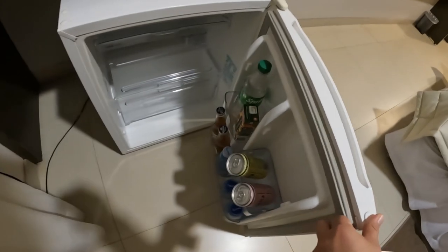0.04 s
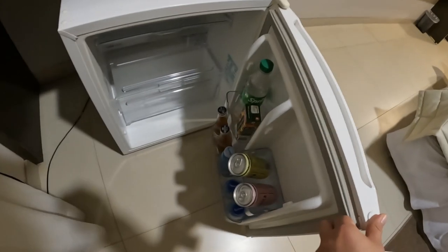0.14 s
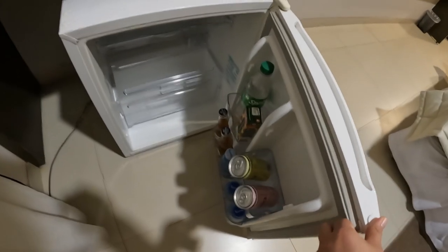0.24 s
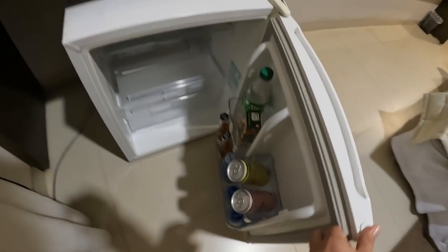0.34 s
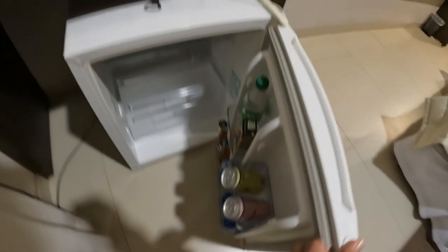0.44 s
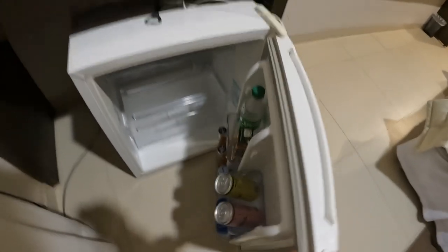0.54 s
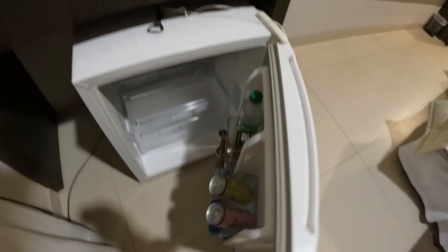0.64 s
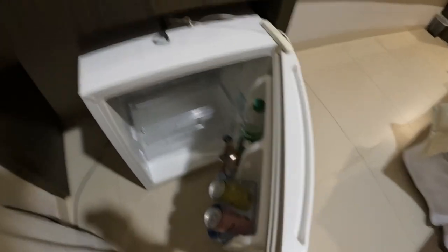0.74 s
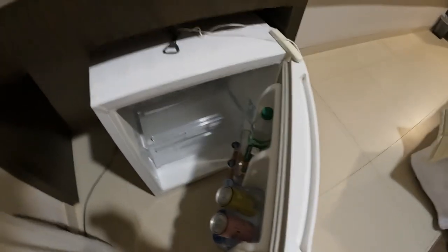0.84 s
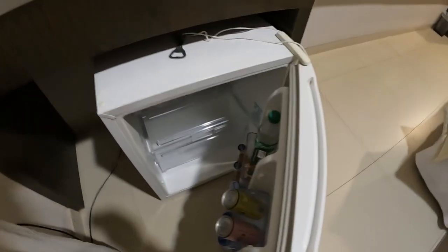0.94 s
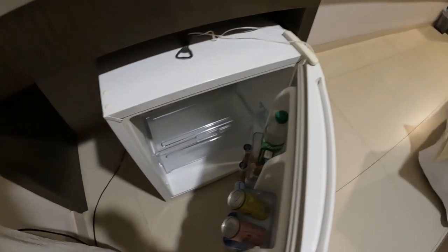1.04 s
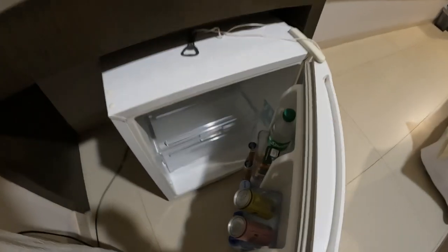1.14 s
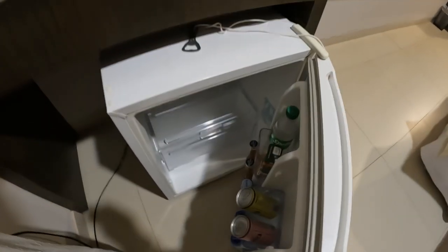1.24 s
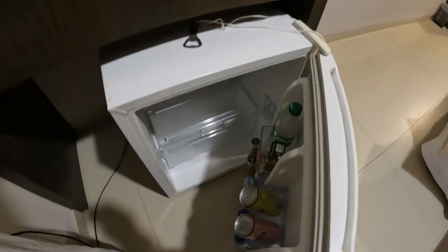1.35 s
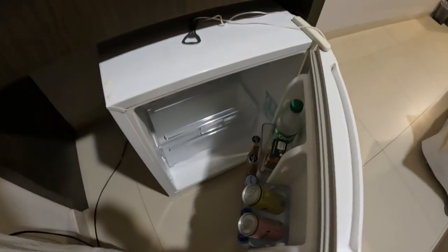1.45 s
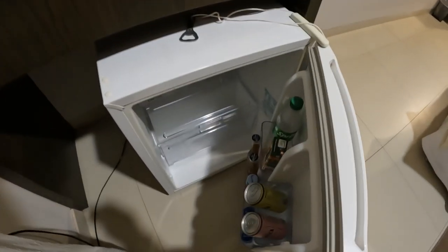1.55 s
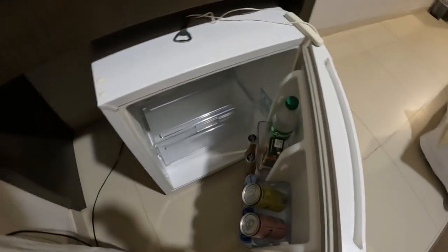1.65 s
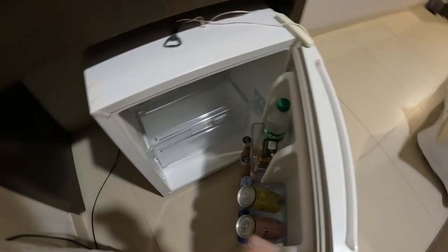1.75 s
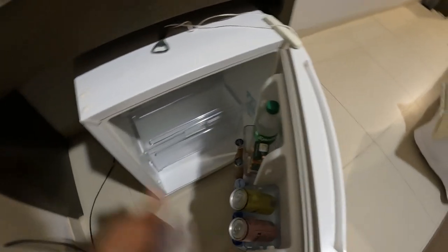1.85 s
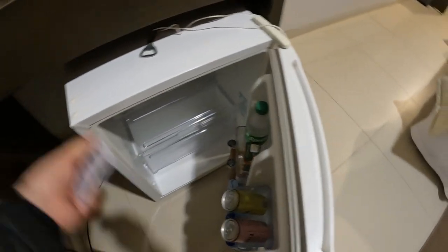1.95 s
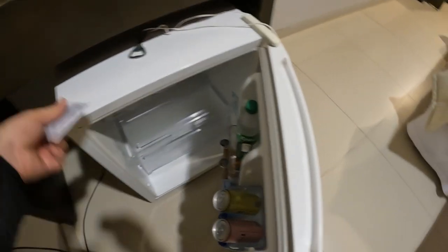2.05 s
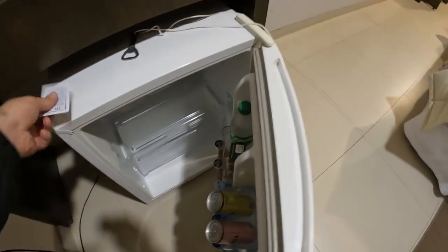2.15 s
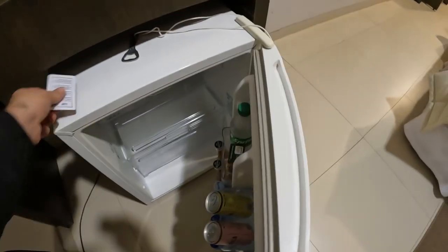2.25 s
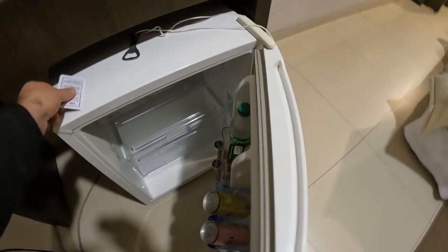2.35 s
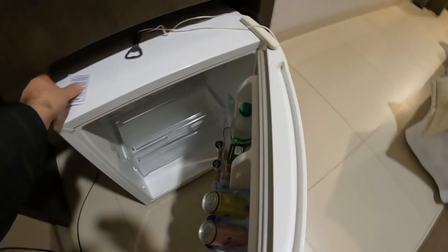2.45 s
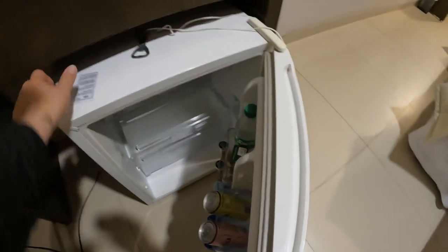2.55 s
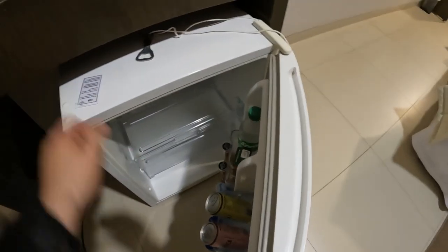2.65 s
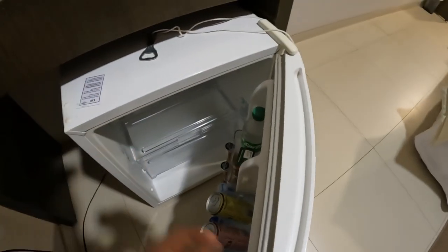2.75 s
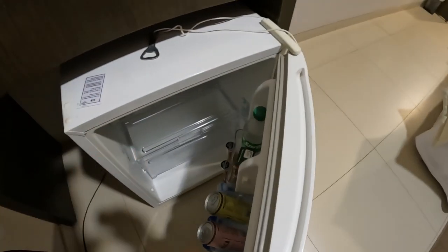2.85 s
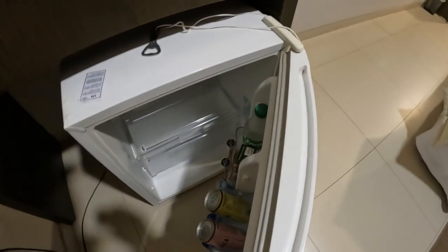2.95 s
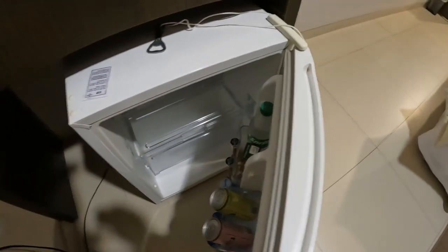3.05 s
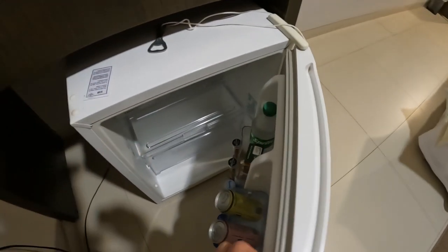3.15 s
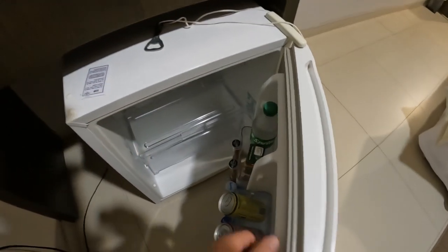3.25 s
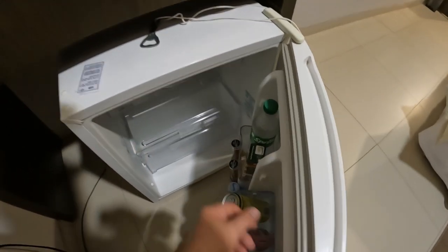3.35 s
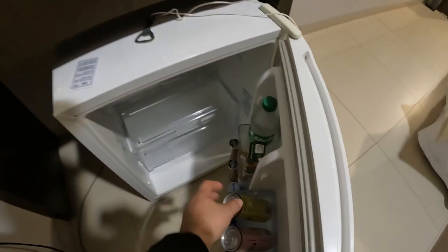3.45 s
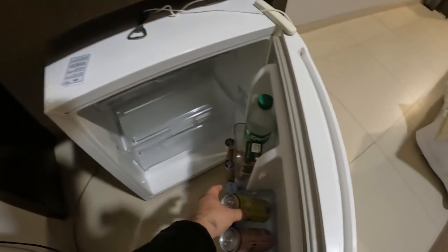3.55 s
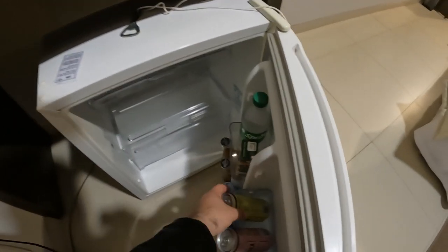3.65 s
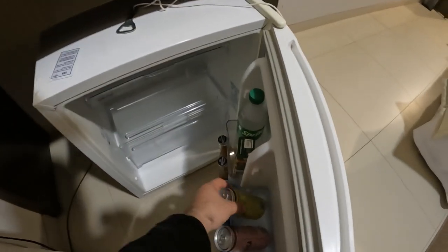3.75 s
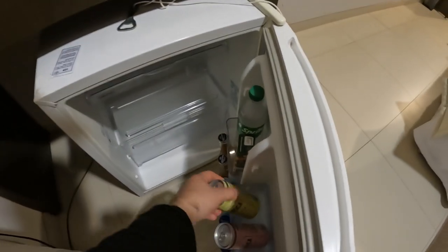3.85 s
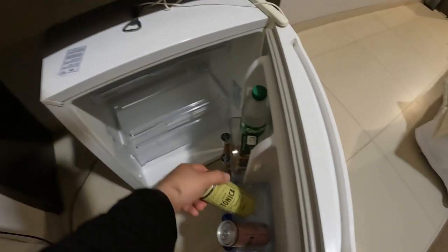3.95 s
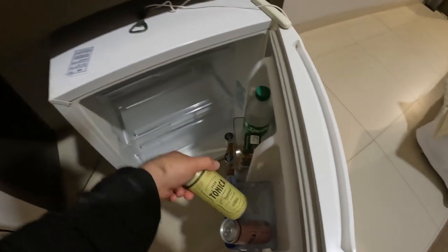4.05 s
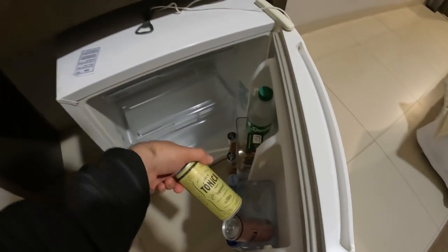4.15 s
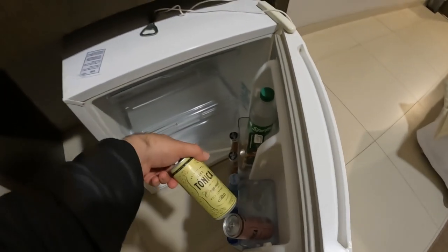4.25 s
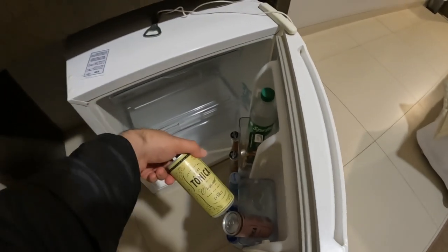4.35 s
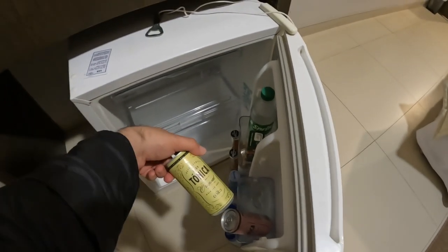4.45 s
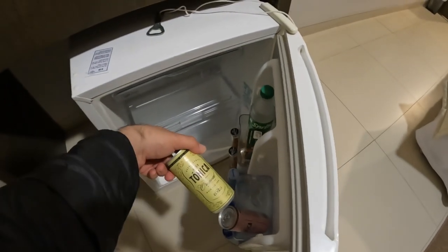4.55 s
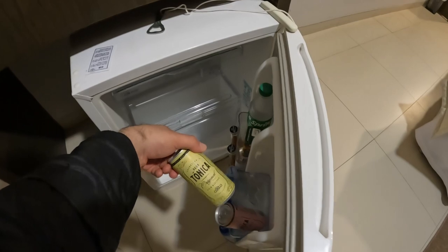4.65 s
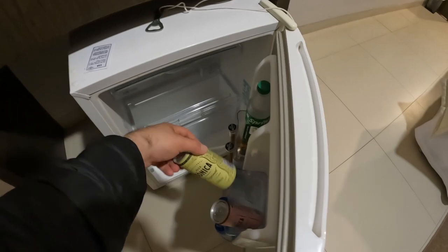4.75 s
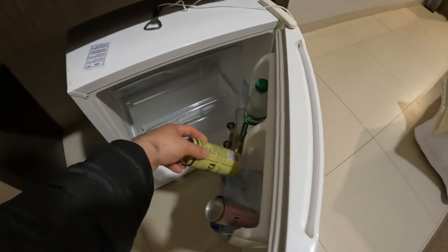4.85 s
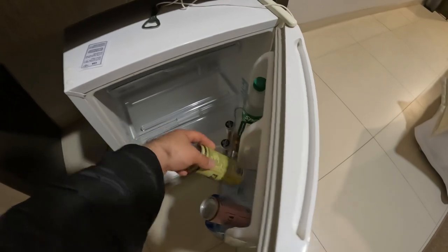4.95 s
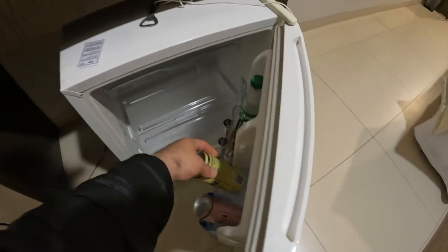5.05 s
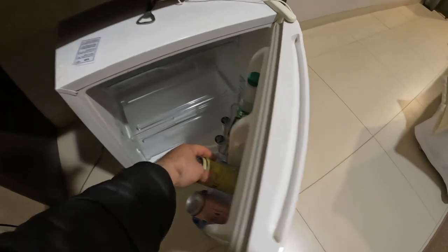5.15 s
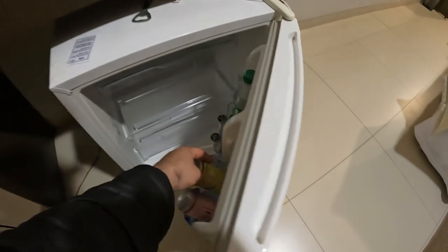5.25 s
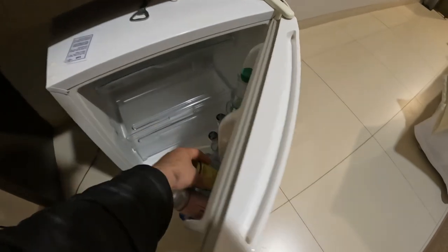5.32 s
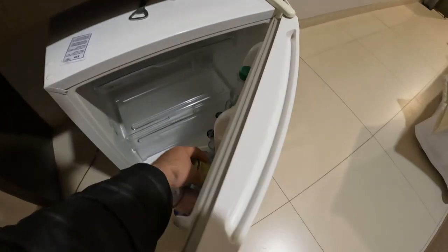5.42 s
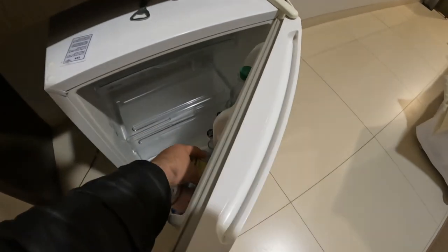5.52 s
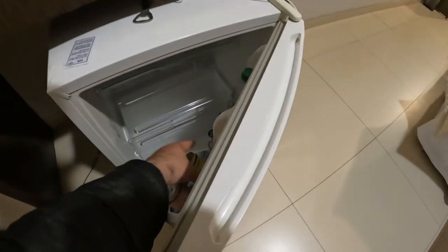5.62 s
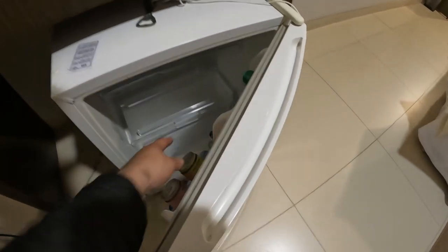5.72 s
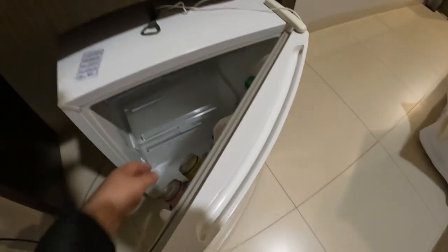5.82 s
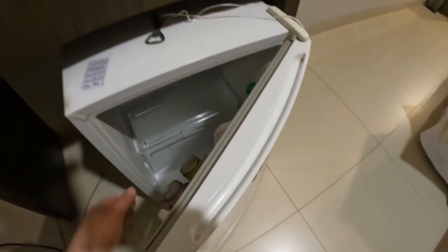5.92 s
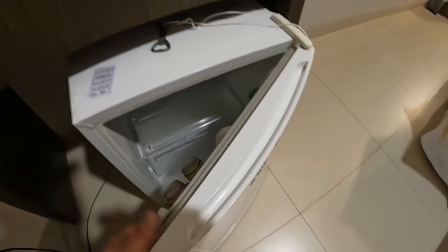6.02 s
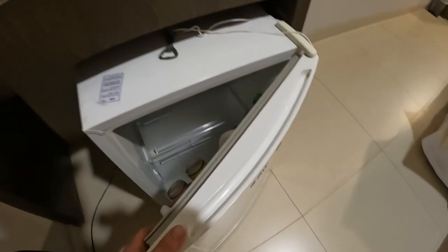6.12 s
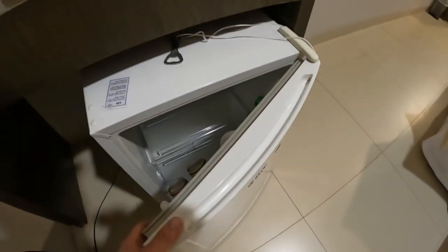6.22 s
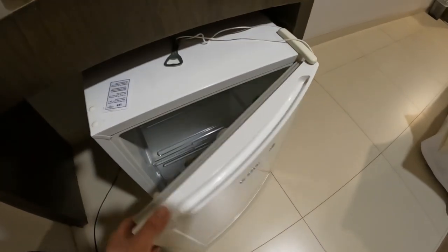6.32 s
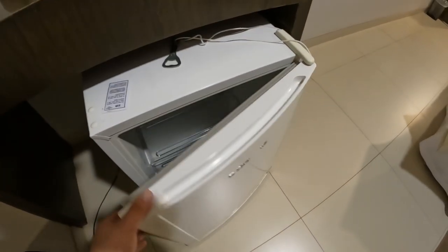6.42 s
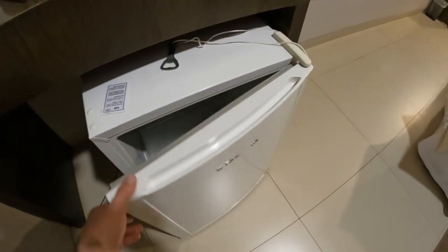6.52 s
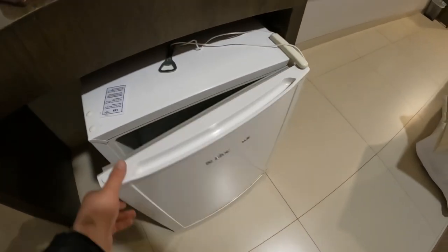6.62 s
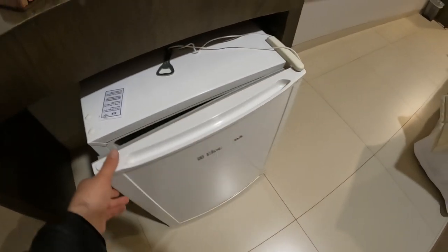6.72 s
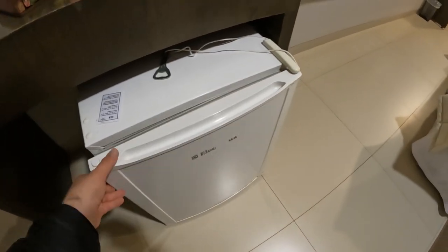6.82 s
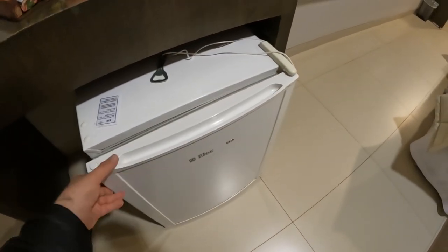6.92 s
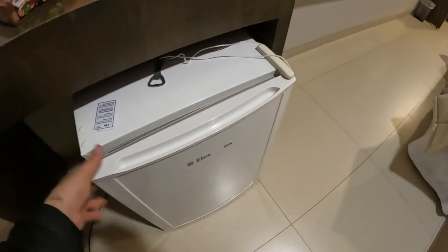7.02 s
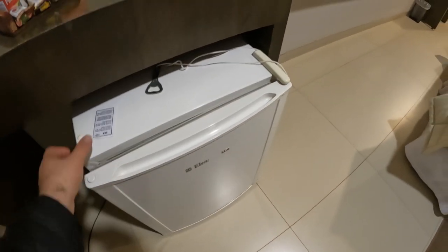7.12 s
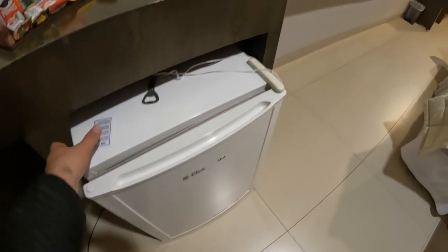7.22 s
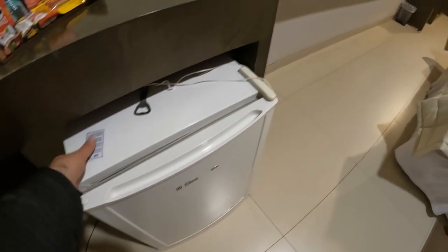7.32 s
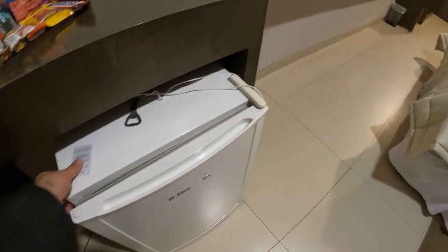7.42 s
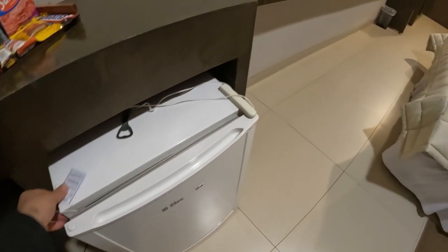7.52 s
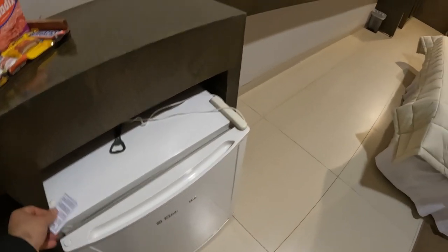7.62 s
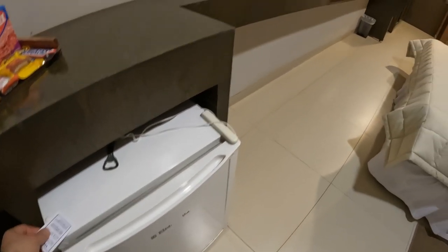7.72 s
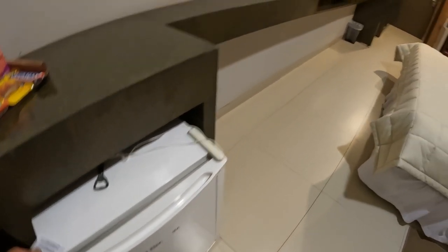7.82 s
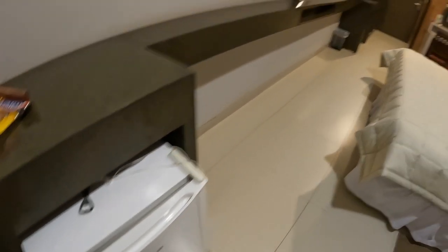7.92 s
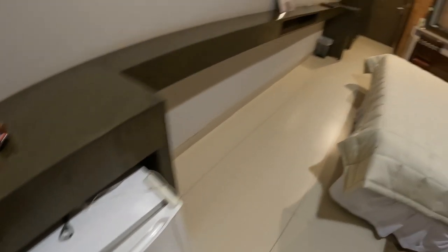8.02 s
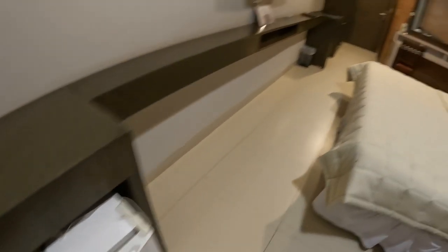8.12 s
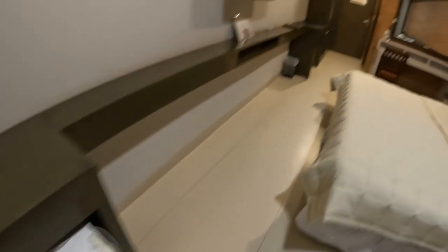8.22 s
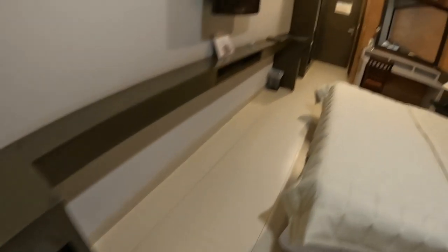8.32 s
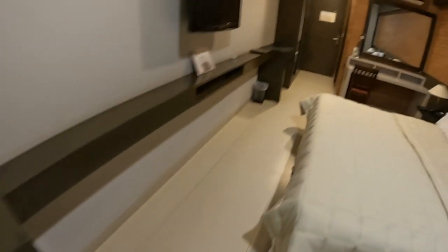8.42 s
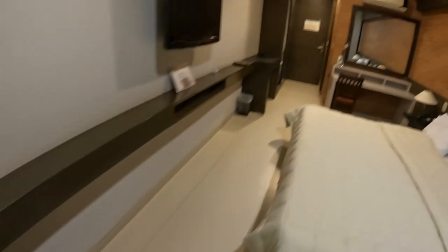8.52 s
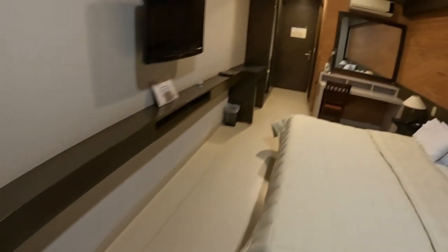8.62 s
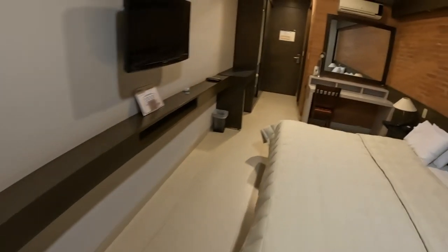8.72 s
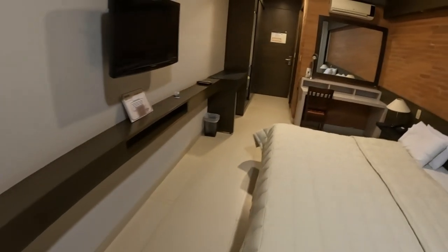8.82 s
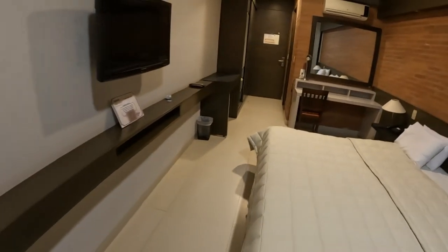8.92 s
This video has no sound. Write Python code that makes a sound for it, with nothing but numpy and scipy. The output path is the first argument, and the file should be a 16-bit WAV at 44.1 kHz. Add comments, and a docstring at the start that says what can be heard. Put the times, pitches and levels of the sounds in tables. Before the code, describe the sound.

Close stereo microphone above a small fridge in a tiled room, with a steady faint low rumble. At 0.3 and 0.8-0.9 seconds the door knocks softly, its hinge muttering low, with a tiny clink and click near 1.0. A cluster of dull thumps and bottle clinks comes at 1.7. Sleeve cloth swishes around 2; a card makes crisp light clicks on the lid at 2.4, followed by muffled bumps from 2.6 to 3.5. Fingers hiss faintly on metal, then a can leaves its shelf with a hollow clunk at 3.8. Quiet rustle follows until it drops back at 5.4-5.5, loud and clattering. The door bumps at 5.7 and 6.3, then slams at 6.9, the loudest event: deep thud, rattling drinks, squeezed seal, and a small knock at 7.03. The card scrapes and squeaks briefly at 7.5-7.75. Soft cloth and faint bumps finish by 8.8.

```python
"""A tiled hotel room, just above a small fridge: its door is nudged, a card is laid on top, a can is lifted
from the door shelf and dropped back, the door slams, and the card slides off. A sleeve swishes with the reaches.
Blows are low pulses, shaped noise bands and damped sines; drinks clink as short sines.
Seal, cloth, skin, hinge and room are coloured noise under level curves; the card adds gliding squeaks."""
import sys
import numpy as np
from scipy import signal
from scipy.fft import rfft, irfft, next_fast_len
from scipy.io import wavfile
from scipy.ndimage import uniform_filter1d

SR = 44100
rng = np.random.default_rng(int(sys.argv[2]) if len(sys.argv) > 2 else 0)


def bounce(signal):
    """Save signal as a 16-bit WAV file at the path given by the first command-line argument."""
    frames = np.transpose(np.atleast_2d(signal))
    limited = np.clip(frames, -1, 1)
    pcm = np.round(limited * 32767).astype(np.int16)
    wavfile.write(sys.argv[1], SR, pcm)


N = 395577

# Knocks on door and rocking load: start_s, strength_db, heft_db (extra bass), reach_hz, length_factor
DOOR_KNOCKS = [(0.315, -43.5, -22, 1580, 0.81), (0.347, -47, 11, 1290, 0.69), (0.799, -35, -21, 527, 0.85),
               (0.827, -38, -14, 890, 0.41), (0.848, -45, -4, 1200, 0.3), (0.881, -36, -3.5, 1880, 0.49),
               (1.672, -35, 5.5, 1490, 0.39), (1.686, -39.5, 7, 1870, 0.42),
               (1.7585, -34.5, 5.5, 1360, 0.55), (1.848, -49, 14, 1070, 0.47), (2.57, -37.5, -19, 426, 0.7),
               (2.913, -51, 13.5, 1700, 0.78), (3.013, -35.5, -19, 427, 0.75),
               (3.056, -46.5, -7, 900, 0.51), (3.16, -37, -16, 364, 0.76), (3.35, -39.5, -12, 423, 0.57),
               (3.451, -30, -0.5, 1520, 0.67), (5.64, -33, 1, 1500, 1), (5.666, -30, 6, 2280, 0.44),
               (5.6987, -27.5, 5, 2640, 0.42), (5.732, -34.5, 3.5, 1440, 0.62),
               (5.92, -49.5, -4, 1970, 0.3), (6.012, -47, 7.5, 600, 0.52), (6.145, -45, 13, 616, 0.86),
               (6.309, -46, 16.5, 1590, 0.56), (6.34, -36, 9.5, 1450, 0.68),
               (6.497, -54.5, 14.5, 1800, 0.8), (6.76, -47.5, 11.5, 394, 0.97),
               (7.302, -44.5, -25, 2250, 1), (7.413, -51, 14, 1200, 0.83), (8.34, -38, -15, 445, 0.52),
               (8.466, -47.5, -24, 604, 0.4)]
# Door resonances: pitch_hz, relative_db, t60_s
DOOR_MODES = [(81, 1, .5), (115, -1, .4), (169, -1, .55), (253, -6, .45), (328, -7, .4), (549, -5, .5),
              (646, -6, .25), (791, -11, .2), (1045, -9, .25), (1150, -6, .25), (1416, -19, .12),
              (1830, -12, .15)]


def door(panels):
    """Knocks ring the door; each is followed by the dull thump of it rocking back."""
    rock_s, rock_db, rock_hz = 0.045, -10.5, 128.7
    rows = list(DOOR_KNOCKS)
    for s, db, heft_db, _, length in DOOR_KNOCKS:
        rows.append((s + rock_s, db + heft_db + rock_db, 0, rock_hz, length))
    return blows(rows, DOOR_MODES, panels, heft_hz=163, slope_db=18, ring_db=-18, ring_hz=894,
                 rise_s=0.0035, snap_db=2.5, contact_s=0.0027, push_db=3.5)


# Can leaves the door shelf, then lands: start_s, strength_db, heft_db, reach_hz, length_factor
CAN_KNOCKS = [(3.757, -38.5, -11.5, 1190, 0.7), (3.783, -27, -13.5, 2400, 0.54),
              (3.8065, -29.5, -12, 4800, 0.53), (3.829, -37.5, -11, 1800, 0.87),
              (5.387, -21, -19, 5300, 0.69), (5.405, -21.5, -8, 2000, 0.51), (5.428, -30.5, -7, 1700, 0.67),
              (5.452, -28.5, 0, 2200, 0.89), (5.4715, -18.5, -8, 3200, 0.71), (5.481, -28.5, -4, 2400, 0.5),
              (5.497, -22.5, -23.5, 700, 0.56)]
# Shelf resonances: pitch_hz, relative_db, t60_s
SHELF_MODES = [(168, -12.5, 0.25), (365, 9.5, 0.4), (426.4, 2.5, 0.36), (564, -18, 0.12), (713, -12, 0.28),
               (890, -15.5, 0.12), (988, -15.5, 0.59), (1062, -10, 0.26), (1350, -10.5, 0.067),
               (1510, -15, 0.11), (1767, -5.5, 0.2), (1940, -21.5, 0.19), (2310, -19, 0.14),
               (2700, -18, 0.13), (3700, -20.5, 0.27), (4960, -17, 0.19)]


def can(panels):
    """The can's contacts ring the door shelf."""
    return blows(CAN_KNOCKS, SHELF_MODES, panels, heft_hz=170, slope_db=17, ring_db=-4.0, ring_hz=1300,
                 rise_s=0.012, snap_db=4.5, contact_s=0.0016, push_db=7.5)


# Door meets cabinet and drinks jump: start_s, strength_db, heft_db, reach_hz, length_factor
SLAM = [(6.894, -24, -9, 4020, 0.45), (6.899, -23, -1, 4000, 0.46), (6.906, -27, -3, 3000, 0.52),
        (6.913, -24, -4, 1700, 0.62), (6.9235, -20, 4.5, 600, 0.58), (6.936, -24, -7, 2000, 0.75),
        (6.954, -23.5, -10, 836, 0.85), (6.964, -31, 1.5, 2200, 1.16), (7.031, -28, -1, 1750, 0.59)]
# Cabinet resonances: pitch_hz, relative_db, t60_s
CABINET_MODES = [(31.62, 7, 1.42), (64.6, 7.5, 0.85), (191, -2, 1.42), (230, 0, 0.18), (386.2, 8.5, 0.12),
                 (937, -11, 0.29), (1090, -16, 0.28)]


def slam(panels):
    """A dense burst of contacts rings the cabinet."""
    return blows(SLAM, CABINET_MODES, panels, heft_hz=171, slope_db=14.5, ring_db=-3.0, ring_hz=810,
                 rise_s=0.001, snap_db=-2.0, contact_s=0.0032, push_db=-9)


# Plastic clicks of hinge, card on lid, fingernail: start_s, strength_db, heft_db, reach_hz, length_factor
CLICKS = [(.649, -50.5, -2, 3000, 0.7), (1.009, -40.5, -27, 5600, 0.6), (1.013, -41.5, -14, 2440, 0.9),
          (1.665, -47, 4, 5650, 0.5), (1.669, -47.5, 3, 4840, 0.45), (2.408, -38, -11, 7800, 0.66),
          (2.427, -41.5, -0.5, 8950, 0.48), (2.446, -33, -11, 6860, 0.82), (5.636, -50, -2, 7000, 1.3),
          (7.68, -49, 3, 9000, 0.53), (8.663, -53.5, -49, 6000, 0.29)]
# Card edge catches on the lid and lets go: start_s, strength_db, heft_db, reach_hz, length_factor
SLIPS = [(7.56, -55, -4, 8100, 0.18), (7.57, -51, 9, 2420, 0.2), (7.59, -53, -10, 6000, 0.17),
         (7.602, -59, -15, 9050, 0.19), (7.642, -54, 7.5, 4500, 0.64)]
# Lid resonances: pitch_hz, relative_db, t60_s
LID_MODES = [(216, 5.9, 0.6), (260, 4.8, 0.79), (1186, 11.5, 0.17), (2126, 17, 0.12), (2403, 14, 0.098),
             (2550, 16, 0.059), (4550, 7, 0.06)]


def lid_clicks(panels):
    """Light, hard contacts ring the plastic lid."""
    clicks = blows([*CLICKS, *SLIPS], LID_MODES, panels, heft_hz=490, slope_db=21.0, ring_db=-15.5,
                   ring_hz=1510, rise_s=0.00048, snap_db=11.5, contact_s=0.0011, push_db=14)
    return panned(clicks, side_db=1.0)


# Door and shelf swing against hinge and seal: start_s, pitch_hz, level_db, t60_s
BOOMS = [(1.762, 79.6, -34, 0.55), (2.915, 55.7, -27.5, 0.38), (3.759, 305, -30.5, 0.095),
         (3.787, 139, -25, 0.24), (3.812, 339, -16, 0.06), (3.812, 369.4, -18, 0.3),
         (5.476, 81, -12.5, 0.46), (5.478, 156.7, -15.5, 0.18), (5.659, 79.2, -23, 0.62),
         (5.668, 369, -28, 0.38), (6.886, 63.4, -2.5, 0.25), (6.925, 356, -18.5, 0.21),
         (6.951, 261, -11, 0.075), (6.955, 63.6, -12, 0.41), (7.191, 63.3, -15.5, .36)]


def booms():
    """Masses swinging on springy hinge and seal, each one damped sine."""
    return notes(BOOMS, rise_cycles=1.0)


# Notes of single knocked cans or bottles, and of the plastic lid struck by the card: start_s, pitch_hz,
# level_db, t60_s
CLINKS = [(.315, 558, -44, 0.4), (.881, 550, -34.5, 0.18), (.881, 1860, -39.5, 0.096),
          (1.011, 1204, -49, 0.19), (1.012, 2504, -29, 0.021), (1.675, 1110, -49, 0.068),
          (1.759, 657, -24, 0.052), (1.759, 1145, -39.5, 0.13), (2.447, 2485, -35, 0.14),
          (2.447, 928, -40.5, 0.14), (3.056, 1057, -45.5, .06), (3.757, 1200, -34.5, 0.037),
          (3.783, 1060, -8, 0.017), (3.783, 2920, -33, 0.066), (3.79, 714, -26.5, 0.19),
          (3.8065, 3700, -32, 0.026), (3.807, 3770, -42, 0.16), (3.807, 1015, -34.5, 0.14),
          (3.807, 1416, -39, 0.16), (5.387, 1130, -20.5, 0.097), (5.387, 2370, -21.5, 0.077),
          (5.387, 2860, -28, 0.079), (5.387, 4100, -34.5, 0.081), (5.405, 1730, -19, 0.07),
          (5.405, 1110, -19, .05), (5.472, 940, -26.5, 0.16), (5.472, 750, -32, .2),
          (5.472, 1415, -24.5, 0.084), (5.473, 1637, -29.5, 0.11), (5.642, 560, -35, .06),
          (5.666, 920, -33, 0.054), (5.699, 1090, -33, 0.067), (5.699, 538, -50.5, 2.5),
          (6.309, 1840, -45, 0.064), (6.34, 1120, -23, 0.015), (6.34, 1880, -36, .04),
          (6.498, 1830, -52, 0.059), (6.937, 1920, -21.5, 0.045), (6.957, 1091, -31, 0.35),
          (7.031, 980, -18, 0.048), (7.031, 1400, -29, 0.044), (7.303, 1071, -44, 0.3),
          (7.68, 1030, -39, 0.033)]


def clinks():
    """Struck cans, bottles and lid, each note one damped sine."""
    return notes(CLINKS, rise_cycles=1.1)


# Drinks jostle: start_s, base_db (each clink is 0-20 dB lower), length_s, highest_mode_hz
RATTLES = [(1.68, -41, .02, 1980), (3.808, -37, 0.034, 3120), (5.389, -24, 0.022, 4400),
           (5.473, -25, 0.045, 4170), (5.639, -38, 0.04, 1910), (5.699, -32, 0.045, 1770),
           (6.9, -23, 0.1, 2580), (7.032, -31, 0.02, 3840)]


def rattle(low_hz=620, t60_s=0.042, count=20):
    """Cans and bottles touch in quick clinks that tend to weaken, each on four short wall modes."""
    out, t = np.zeros((2, N)), np.arange(SR // 5) / SR
    for s, db, length_s, high_hz in RATTLES:
        for turn, (slack, softness, side, *pitches) in enumerate(rng.random((count, 7))):
            when = (turn + slack) / count  # share of the rattle's length
            hz = low_hz * (high_hz / low_hz) ** np.array(pitches)[:, None]
            modes = np.sqrt(low_hz / hz) * (1 - np.exp(-t * hz)) * np.sin(2 * np.pi * hz * t)
            walls = modes.sum(0) / 2
            clink = walls * amp(db - 10 * (softness + when) - 60 * t / t60_s)
            add(out, s + when * length_s, panned(clink, 6 * (side - .5)))
    return out


# Seal squeezed against the cabinet, then settling: peak_s, level_db, rise_s, fall_s (per 10 dB)
SQUEEZES = [(6.92, -25.5, 0.035, 0.059), (7.12, -42, 0.067, 0.07), (7.335, -38.5, 0.025, 0.085),
            (7.415, -39.5, 0.038, 0.049), (7.57, -47.5, 0.13, 0.074)]
# Seal spectrum: freq_hz, relative_db_per_hz
SEAL_COLOUR = [(90, 4), (190, 14), (380, 8.5), (600, -4), (1100, -11), (2000, -17.5), (3000, -27),
               (7000, -32.5), (14000, -71)]


def seal():
    """Compressed rubber as swells of low-heavy noise."""
    return swells(SQUEEZES, shape=2.6) * noise(SEAL_COLOUR, SAME)


# Reaches of the sleeved arm: peak_s, motion_db (before swish_db), rise_s, fall_s (per 10 dB)
REACHES = [(0.65, -58.5, 0.17, 0.2), (1.13, -70, 0.66, 0.28), (2.02, -60, 0.39, 0.41),
           (2.72, -57.5, 0.41, 0.33), (3.55, -57, 0.35, 0.57), (5.86, -61.5, 0.66, 0.53),
           (6.88, -66.5, 0.34, 0.36), (8.03, -60, 0.36, 1), (8.75, -70.5, 0.62, 1)]
# Cloth spectrum: freq_hz, relative_db_per_hz
SLEEVE_COLOUR = [(300, -18.5), (450, 0), (600, -7), (800, -7), (1050, 3), (1900, 1.5), (3500, -1.5),
                 (5500, -3.5), (7400, -6.5), (8400, -15), (11500, -15.5), (13800, -25.5), (16000, -51)]


def sleeve(swish_db=4.0, rest_db=-80, flutter_db=1.01, side_db=3.0, crinkle_db=-6, crinkles_per_s=14):
    """Smooth cloth rubs on itself to the left, with tiny decaying noise snaps where it creases."""
    motion = np.hypot(swells(REACHES, shape=1.93), amp(rest_db))
    swish = noise(SLEEVE_COLOUR) * motion * amp(swish_db + flutter_db * wobble(N, size=900))
    snaps = (rng.random(N) < crinkles_per_s / SR) * np.minimum(rng.exponential(1, N), 3)
    decay = np.exp(-1 / (0.0022 * SR))  # 2.2 ms time constant
    creases = signal.lfilter([1], [1, -decay], snaps) * rng.standard_normal((2, N))
    crease_level = np.minimum(motion, amp(-65.0)) * amp(crinkle_db)
    return panned(swish + creases * crease_level, side_db)


# Fingers brush can and shelf: peak_s, level_db (mean of the grain), rise_s, fall_s (per 10 dB)
BRUSHES = [(3.27, -64, 0.065, 0.021), (3.54, -58.5, 0.11, 0.11), (3.73, -60, 0.034, 0.023),
           (3.96, -70, .05, 0.2), (5.3, -75, 1, 0.13), (5.383, -66, 0.011, 0.01)]
# Skin-on-metal spectrum: freq_hz, relative_db_per_hz
BRUSH_COLOUR = [(2000, -24.5), (5000, 3.5), (7500, -2), (10500, -1.5), (13500, -10.5), (16000, -35)]


def fingers(grain_db=2.5):
    """Thin, grainy hiss of skin on smooth metal."""
    return swells(BRUSHES, shape=1.5) * amp(grain_db * wobble(N, size=400)) * noise(BRUSH_COLOUR)


# Short dry scrapes, mostly the card over the lid: peak_s, level_db (before grain, pan), rise_s, fall_s (per 10 dB)
PULLS = [(.652, -51.5, .02, 0.015), (7.545, -53, 0.046, 0.053), (7.615, -52.5, 0.12, 0.029),
         (7.65, -45.5, 0.025, 0.056), (7.74, -56.5, 0.075, 0.028)]
# Scrape spectrum: freq_hz, relative_db_per_hz
SCRAPE_COLOUR = [(600, -33), (950, 3), (2000, 6.5), (2700, 4.5), (4300, 5.5), (7000, 2), (10500, -3.5),
                 (14000, -10), (16000, -56)]
# Stick-slip squeaks: start_s, length_s, level_db (before arch, grain, pan), start_hz, glide_octaves,
# arch_octaves, jitter_share, overtone_db
SQUEAKS = [(5.854, 0.019, -59, 7450, 0.044, 0, .1, -28),
           (7.505, 0.034, -45.5, 1208, 0.85, 0.098, 0.11, -17),
           (7.6, 0.016, -48, 5000, 0.35, 0.0063, .02, -18),
           (7.612, 0.023, -48, 6200, -0.3, 0.012, 0.017, -15),
           (7.592, 0.03, -50, 7300, 0.04, 0.02, 0.025, -29),
           (7.625, 0.013, -51, 6900, .08, 0.138, .02, -27), (7.63, 0.0183, -52, 9600, .25, 0.014, .02, -27),
           (7.641, 0.024, -44, 1016, .08, 0.063, 0.04, -1),
           (7.658, 0.0134, -50, 5650, -0.2, 0.015, .015, -9),
           (7.735, 0.027, -54.5, 4140, -0.13, 0.048, 0.029, -18)]
# Squeak harmonics, from the fundamental up: relative_db (overtone_db is added above the first)
SQUEAK_DB = [-4.5, -1, -4, -0.5, -8]


def card_slide(grain_db=1.5, side_db=2.0, stutter_db=6.5):
    """Grainy friction noise with short, unsteady stick-slip squeaks."""
    out = swells(PULLS, shape=0.87) * noise(SCRAPE_COLOUR)
    for s, length_s, db, start_hz, glide, arch, jitter, overtone_db in SQUEAKS:
        u = np.arange(0, 1, 1 / (length_s * SR))
        bow = np.sin(np.pi * u)
        hz = start_hz * 2 ** (glide * u + arch * bow)
        turns = np.cumsum(hz * (1 + jitter * wobble(SR, size=30)[:len(u)])) / SR
        squeak = np.zeros(len(u))
        for k, harmonic_db in enumerate(SQUEAK_DB, 1):
            level = amp(harmonic_db + overtone_db * (k > 1))
            squeak += level * (k * hz < EDGE_HZ) * np.sin(2 * np.pi * k * turns)
        stutter = amp(stutter_db * wobble(SR, size=90)[:len(u)])
        add(out, s, amp(db) * bow * evened(squeak * stutter))
    return panned(out * amp(grain_db * wobble(N, size=120)), side_db)


# Door swings: peak_s, level_db, rise_s, fall_s (per 10 dB)
SWINGS = [(0.9, -48, .28, 0.43), (2.55, -59.5, 1, 0.42), (3.5, -63, 0.97, 1), (5.65, -63, 0.41, 0.33),
          (6.35, -54.5, 0.18, 0.47), (7.3, -54.5, 0.27, 0.89), (8.45, -55, 0.13, 0.39)]
# Hinge spectrum: freq_hz, relative_db_per_hz
SWING_COLOUR = [(20, -9), (35, 16), (70, -5.5), (120, -5), (200, -1), (350, -0.5), (550, -15), (900, -29.5),
                (2000, -53.5)]


def hinge_mutter(rest_db=-75):
    """The swinging door mutters on its hinge: low noise over a faint constant floor."""
    return np.hypot(swells(SWINGS, shape=1.4), amp(rest_db)) * noise(SWING_COLOUR)


# Room spectrum: freq_hz, relative_db_per_hz
ROOM_COLOUR = [(18, 9), (45, 1.5), (62, -14.5), (90, -23.5), (160, -12), (225, -14.5), (290, -33.5),
               (700, -35.5), (3000, -66), (6000, -42), (13000, -57), (16000, -72)]


def room(level_db=-49.5, side_db=-5.5):
    """Steady low rumble, stronger on the right."""
    return panned(amp(level_db) * noise(ROOM_COLOUR), side_db)


# Struck panels in the room: centre_hz, colour_db, crack_t60_s, tail_t60_s, tail_db, rise_s
# (times are for length_factor 1)
PANELS = [(47.7, -5, 0.13, 0.98, -10, 0.022), (79.6, 0.5, 0.067, 0.61, -1, 0.036),
          (156, -1.5, .14, 0.98, -5, 0.018), (295, 0.5, 0.065, 0.61, -5.5, 0.011),
          (542, -3.5, 0.14, 0.7, -9, 0.0069), (850, -3, 0.016, 0.42, -11.5, 0.001),
          (1055, -2.5, 0.12, 0.61, -12.5, 0.0015), (2180, -5.5, 0.12, 0.45, -15, 0.0018),
          (2600, -6, 0.027, 0.34, -8, 0.00082), (4610, 0, 0.035, 0.25, -9, 0.001),
          (8600, 1.5, 0.0054, 0.1, -6, 0.0031), (11100, -4, 0.034, 0.26, -8.5, 0.00018),
          (14340, -25.5, .02, .14, -30, .0002)]
# Left-right likeness of near knocks: freq_hz, likeness_0_to_1
SAME = [(130, 1), (300, .99), (640, .92), (1400, .94), (3100, .85), (15000, .7)]


def dense_modes():
    """Panels and room have countless modes: overlapping noise bands, each with a crack and a tail."""
    centre, colour_db, crack, tail, tail_db, rise = np.transpose(PANELS)[:, :, None]
    hz, z = noise_spectrum(4 * SR, SAME)
    # the same narrow peaks colour every blow
    z = z * amp(3.8 * wobble(len(hz), size=220) * np.clip(hz / 700, 0, 1))
    # loose parts chatter, so the treble comes in spurts
    chatter = amp(2.6 * wobble(4 * SR, size=130) * np.clip(centre / 1500, 0, 1))
    bands = []
    for one, spurts in zip(np.eye(len(PANELS)), chatter):
        share = read(np.c_[centre, one], hz) * (hz > 30)
        bands.append(evened(irfft(z * share) * spurts))
    t = np.arange(SR) / SR
    fade = np.hypot(amp(-60 * t / crack), amp(tail_db - 60 * t / tail))
    return np.array(bands), amp(colour_db) * (1 - np.exp(-t / rise)) * fade


def ring(modes, rise_s):
    """An object's own modes, swelling briefly and dying away."""
    t = np.arange(SR) / SR
    tones = np.zeros(SR)
    for k, (hz, db, t60) in enumerate(modes):
        tones += (-1) ** k * amp(db - 60 * t / t60) * np.sin(2 * np.pi * hz * t)
    return tones * (1 - np.exp(-t / rise_s))


def blows(rows, modes, panels, heft_hz, slope_db, ring_db, ring_hz, rise_s, snap_db, contact_s, push_db):
    """A blow pushes one pulse, excites bands up to its reach (then slope_db/octave), rings the object."""
    bands, fades = panels
    out, centre, tones = np.zeros((2, N)), np.transpose(PANELS)[0], ring(modes, rise_s)
    t = np.arange(SR) / SR
    snap = amp(snap_db * np.exp(-t / contact_s))  # level offset at contact, fading out
    for s, db, heft_db, reach_hz, length in rows:
        weight = amp(heft_db / (1 + (centre / heft_hz) ** 4))
        gains = amp(db) * weight / np.hypot(1, amp(slope_db * np.log2(centre / reach_hz)))
        start = rng.integers(bands.shape[-1] - SR)
        # a damped blow runs through its decay faster
        clock = np.minimum(np.arange(SR) / max(length, .2), SR - 1).astype(int)
        envelopes = gains[:, None] * fades[:, clock]
        knock = np.einsum("bct,bt->ct", bands[:, :, start:start + SR], envelopes)
        # soft or damped blows ring less
        ringing = amp(ring_db) * length * np.interp(ring_hz, centre, gains)
        # higher reach, narrower pulse
        u = np.pi * reach_hz * t[:SR // 20] - 4
        add(out, s, -amp(db + push_db) * u * np.exp(-u ** 2 / 2))
        add(out, s, snap * knock + ringing * tones)
    return out


def notes(rows, rise_cycles):
    """Single damped vibrations that swell over about a cycle and die away."""
    out, t = np.zeros((2, N)), np.arange(SR) / SR
    for s, hz, db, t60 in rows:
        envelope = amp(db - 60 * t / t60) * (1 - np.exp(-t * hz / rise_cycles))
        add(out, s, -envelope * np.sin(2 * np.pi * hz * t))
    return out


def swells(rows, shape):
    """Level of a series of gestures at every sample; a higher shape rounds their peaks."""
    t = np.arange(N) / SR
    power = np.zeros(N)
    for s, db, rise, fall in rows:
        distance = np.maximum((s - t) / rise, (t - s) / fall)
        power += amp(db - 10 * distance ** shape) ** 2
    return np.sqrt(power)


def noise_spectrum(size, likeness):
    """Frequencies and spectra of white noise at two close microphones."""
    hz = np.fft.rfftfreq(size, 1 / SR)
    a, b = rfft(rng.standard_normal((2, size)))
    same = np.clip(read(likeness, hz), 0, 1)
    return hz, np.array([a, same * a + np.sqrt(1 - same ** 2) * b])


# Left-right likeness of scattered sound: freq_hz, likeness_0_to_1
SCATTERED = [(50, 0.7), (130, 0.85), (640, 0.12), (7000, 0.62), (15000, 0.51)]


def noise(colour, likeness=SCATTERED):
    """Stereo noise of rms 1 with the given spectrum."""
    hz, z = noise_spectrum(next_fast_len(N, True), likeness)
    return evened(irfft(z * amp(read(colour, hz)))[:, :N])


def wobble(count, size):
    """Random wandering of rms 1 that changes over size points."""
    return evened(uniform_filter1d(rng.standard_normal(count), size=size))


def amp(db):
    """Decibels to amplitude."""
    return 10 ** (np.asarray(db) / 20)


def evened(x):
    """Scales to rms 1."""
    return x / np.sqrt(np.mean(x ** 2) + 1e-20)


def read(points, hz):
    """Reads a spectrum on a log-frequency axis."""
    f, value = np.transpose(points)
    return np.interp(np.log(hz + 1), np.log(f + 1), value)


def add(mix, s, sound):
    """Mixes a sound in at s seconds."""
    part = mix[:, round(s * SR):][:, :sound.shape[-1]]
    part += sound[..., :part.shape[1]]


def panned(x, side_db):
    """Places a sound by its left-right level difference."""
    return x * amp(np.array([[.5], [-.5]]) * side_db)


def scene():
    """Blows on door, shelf, cabinet and lid, with the rubbing sounds and the room beneath them."""
    panels = dense_modes()
    impacts = door(panels) + can(panels) + slam(panels) + lid_clicks(panels)
    resonances = booms() + clinks() + rattle()
    rubbing = seal() + sleeve() + fingers() + card_slide()
    return impacts + resonances + rubbing + hinge_mutter() + room()


EDGE_HZ = 15400
# Microphone balance, left brighter: freq_hz, left_minus_right_db
BALANCE = [(200, 0), (380, .4), (700, -.7), (1300, -.2), (2400, .4), (5500, 1.4), (8100, 3), (15000, 5)]


def record(dry):
    """The colours of the two microphones, then a steep low-pass at EDGE_HZ."""
    size = next_fast_len(N + SR, True)
    balance_db = read(BALANCE, np.fft.rfftfreq(size, 1 / SR))
    heard = irfft(panned(rfft(dry, size), balance_db), size)[:, :N]
    low_pass = signal.firwin(511, EDGE_HZ, window=("kaiser", 9), fs=SR)
    return signal.oaconvolve(heard, low_pass[None], "same")


dry = scene()
out = record(dry)
bounce(out)
```